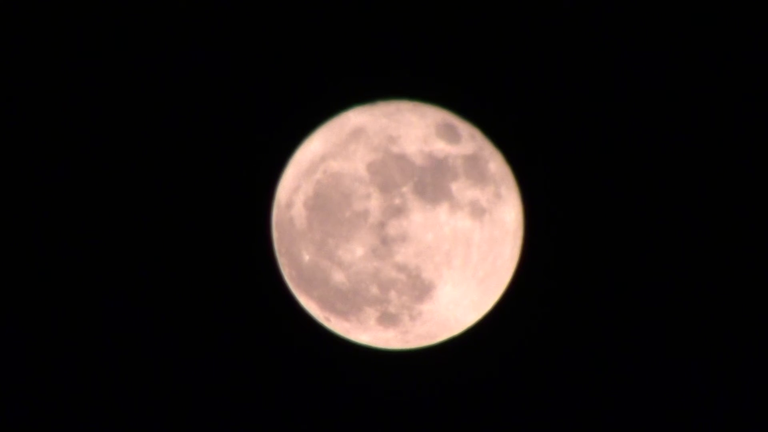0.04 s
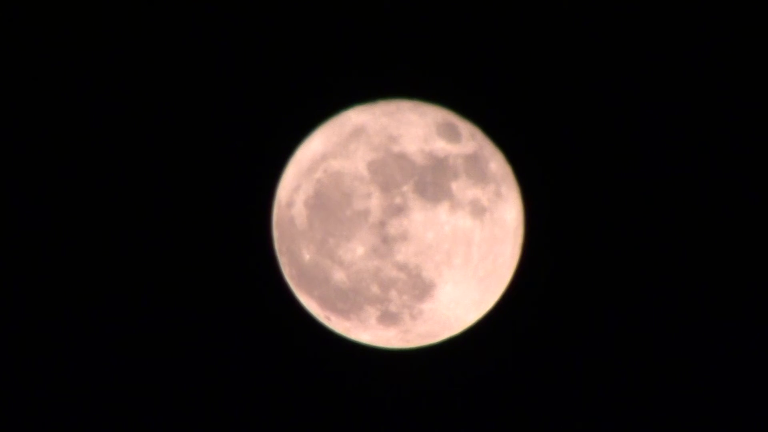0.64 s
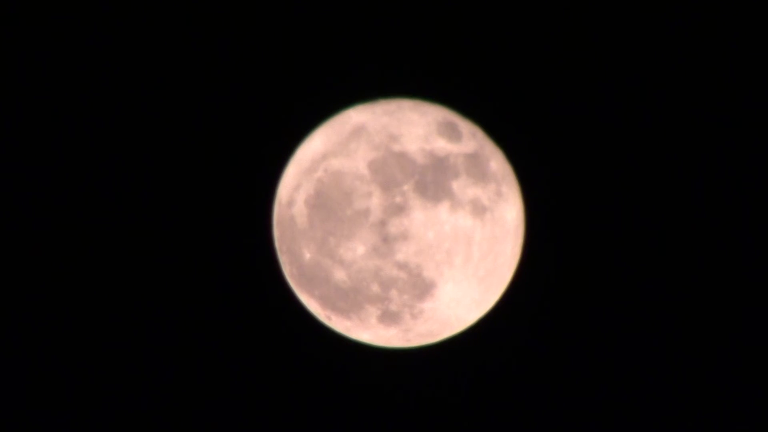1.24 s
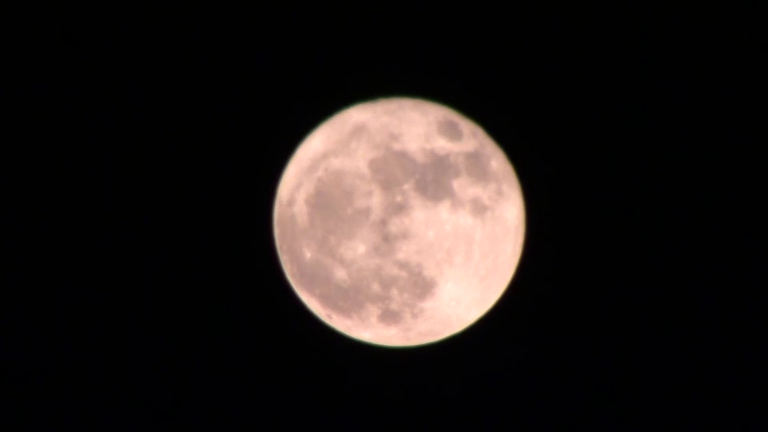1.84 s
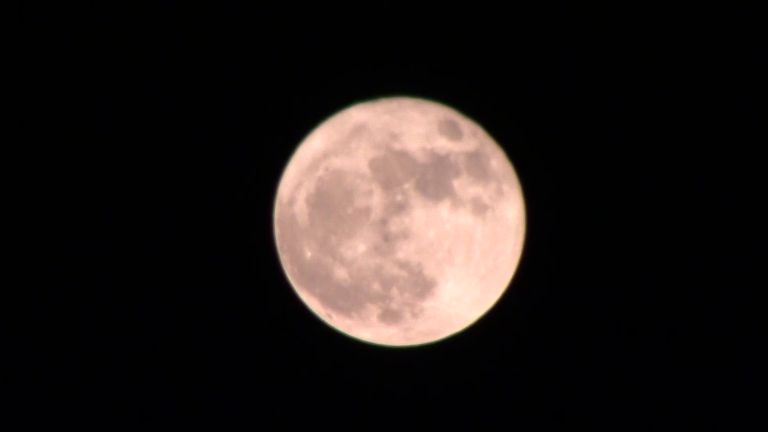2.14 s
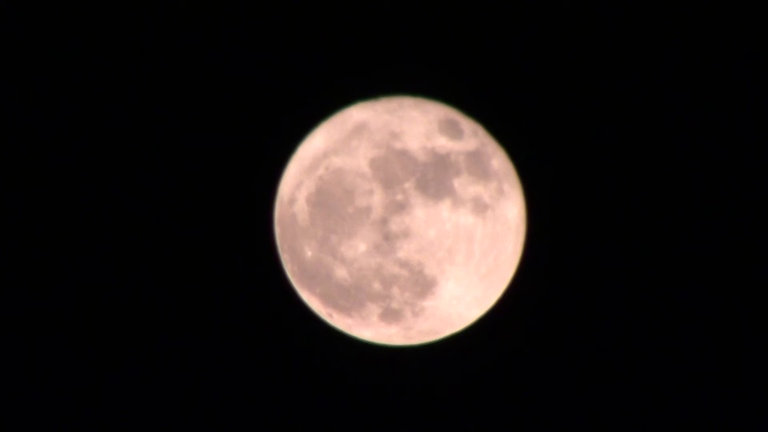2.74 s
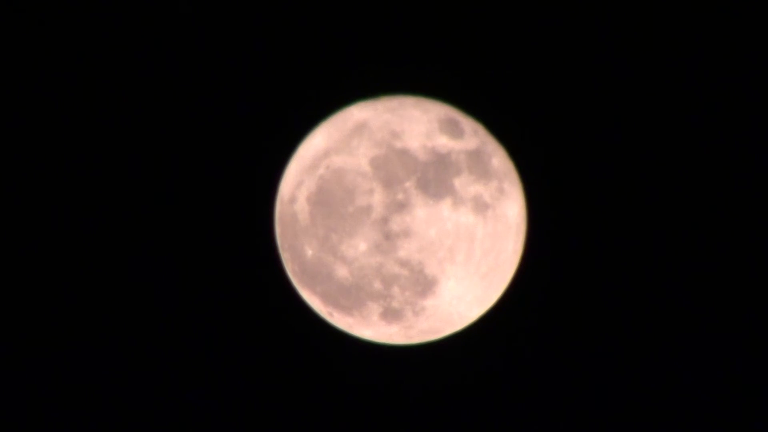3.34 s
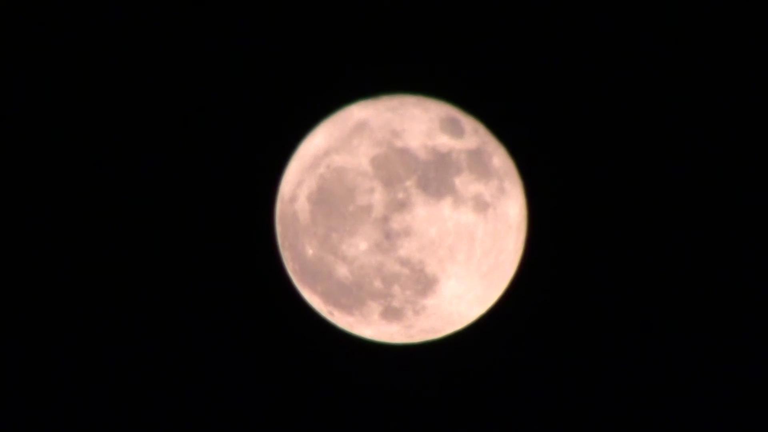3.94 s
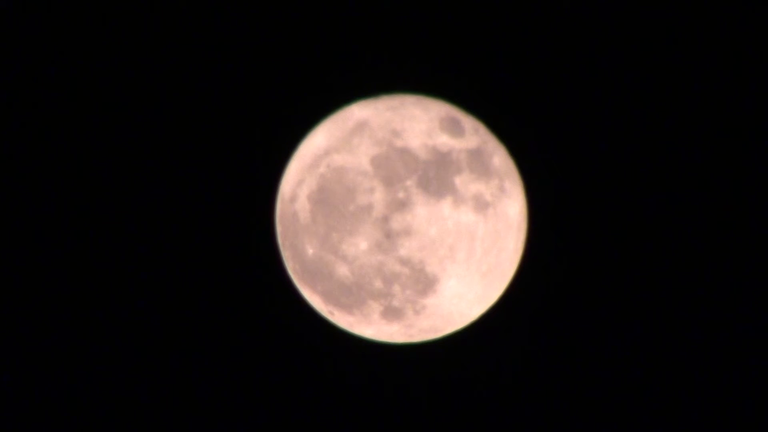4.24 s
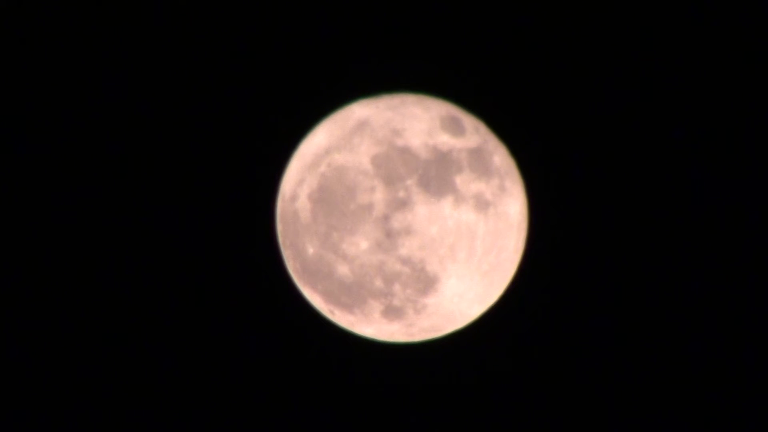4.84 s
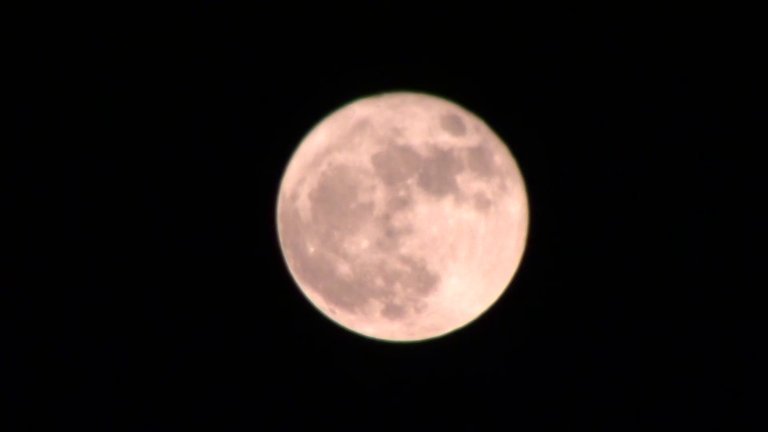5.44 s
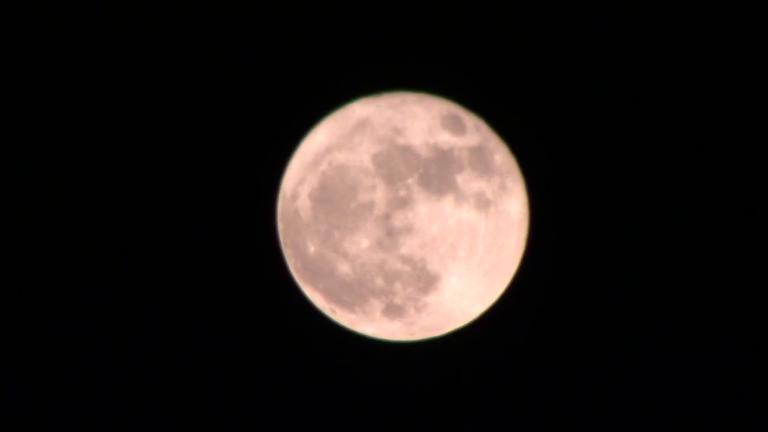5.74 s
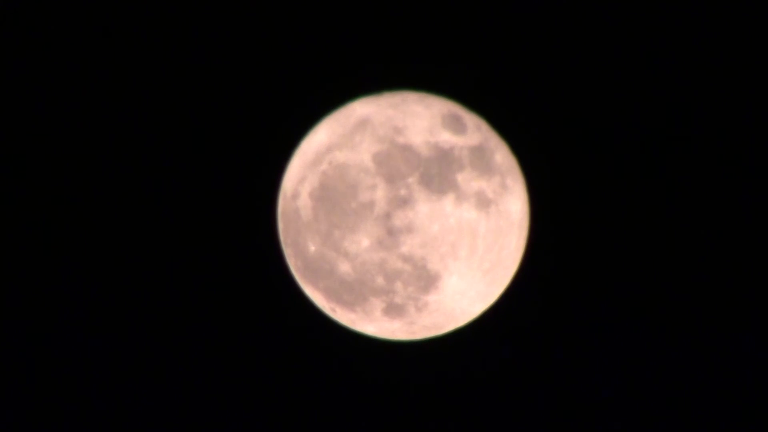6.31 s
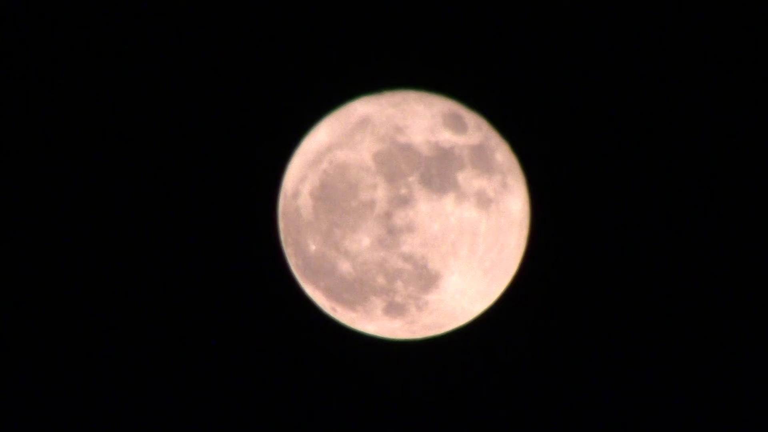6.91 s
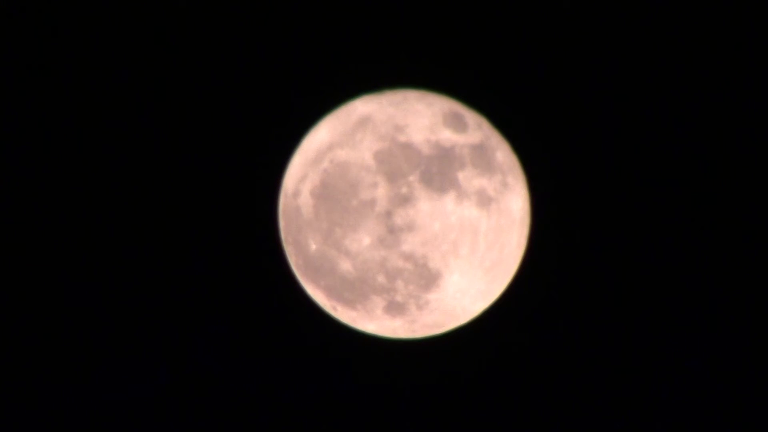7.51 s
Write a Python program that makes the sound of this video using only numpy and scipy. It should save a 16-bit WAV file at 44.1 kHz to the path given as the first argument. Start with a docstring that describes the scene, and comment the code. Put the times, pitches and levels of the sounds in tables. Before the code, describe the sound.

A small owl gives a wavering, falling cry, then a long pulsed trill of soft hoots over quiet night hiss.

```python
"""Small owl at night

A wavering whinny slides down into a growl, then a long trill of soft hoots slows and quickens again.
The owl's syrinx sings a nearly pure tone that gains overtones when pressed; nearby surfaces colour
and echo it. A far animal calls faintly over a quiet hiss, with light ticks and two small knocks.
A limiter flattens the loudest notes."""
import sys
import numpy as np
from scipy import signal
from scipy.fft import rfft, irfft, next_fast_len
from scipy.io import wavfile
from scipy.ndimage import uniform_filter1d, minimum_filter1d, map_coordinates

SR = 44100
rng = np.random.default_rng(int(sys.argv[2]) if len(sys.argv) > 2 else 0)


def materialize(psi):
    """Save the field psi as 16-bit PCM at rate SR to the path in sys.argv[1].

    A 1-D psi becomes a single channel; in a 2-D psi each row is a channel.
    """
    bounded = np.clip(np.atleast_2d(psi).T, -1, 1)
    quanta = np.round(bounded * 32767).astype(np.int16)
    wavfile.write(sys.argv[1], SR, quanta)


N = 338247
TIME = np.arange(N) / SR


def amp(db):
    """Decibels to gain."""
    return 10 ** (np.asarray(db) / 20)


def along(points, hz):
    """Read (frequency, value) points on a log frequency axis."""
    freqs, values = np.transpose(points)
    return np.interp(np.log(hz + 1), np.log(freqs), values)


def curves(rows):
    """One value per sample for each column after the time."""
    times, *columns = np.transpose(rows)
    return [np.interp(TIME, times, column) for column in columns]


def wobble(rate):
    """A smooth random curve, rate knots a second."""
    knots = rng.standard_normal(int(N * rate / SR) + 4)
    return map_coordinates(knots, [TIME * rate])


def filtered(x, response):
    """Filter x by a complex response of frequency."""
    size = next_fast_len(N + SR // 2)
    return irfft(rfft(x, size) * response(np.fft.rfftfreq(size, 1 / SR)), size)[:N]


def noise(response):
    """Coloured noise of rms 1."""
    x = filtered(rng.standard_normal(N), response)
    return x / np.sqrt(np.mean(x ** 2) + 1e-20)


def band(centre_hz, half_width_hz, slope=4):
    """Noise of rms 1 in one resonance."""
    return noise(lambda hz: 1 / (1 + (np.abs(hz - centre_hz) / half_width_hz) ** slope))


# Dark bed of night air: (frequency [Hz], relative level [dB])
AIR_SPECTRUM = [(18, -56.5), (30, -40), (126, -11), (173, -11), (270, -8), (443, -5.5), (546, -2.5),
                (897, -7.5), (970, -8), (1200, -12), (1870, -15.5), (2690, -22), (3780, -24), (7260, -28.5),
                (15500, -42.5)]
# Colour of the brighter hiss: (frequency [Hz], relative level [dB])
HISS_SPECTRUM = [(300, -16.5), (800, 2.5), (1500, 3.5), (2200, 5.5), (2750, -2.5), (3400, -2), (3900, 3),
                 (4500, -7), (5000, -7), (5700, -5.5), (6600, -13.5), (8000, -39.5), (12000, -42.5)]
# The hiss comes and goes: (time [s], level [dB])
HISS_FADES = [(0, -48), (.6, -65.5), (.9, -57.5), (2.4, -57), (4.5, -57.5), (5.8, -60.5), (6.45, -59),
              (6.63, -55), (6.9, -56), (7.15, -64.5), (7.67, -66)]
# Hum and whine: (centre [Hz], half width [Hz], level [dB])
HUM_BANDS = [(203.4, 2.5, -69.5), (227.3, 8.1, -69.5), (295.4, 9.7, -72), (11150, 240, -86.5)]
def background(air_db=-55.5, drift_db=1.3):
    """Still air, a drifting hiss and faint narrow hums."""
    air = amp(air_db) * noise(lambda hz: amp(along(AIR_SPECTRUM, hz)))
    hiss_db = curves(HISS_FADES)[0] + drift_db * wobble(18)
    hiss = amp(hiss_db) * noise(lambda hz: amp(along(HISS_SPECTRUM, hz)))
    hum = sum(amp(db) * band(hz, half_width, slope=2) for hz, half_width, db in HUM_BANDS)
    return air + hiss + hum


# Faint high ticks and rustles, and thin whistles near 6.3 kHz riding on the slow hoots: (time [s], length [s],
# centre [Hz], level [dB])
TICK_BURSTS = [(0.709, 0.028, 5470, -62.5), (2.378, 0.044, 3330, -58.5), (4.674, 0.014, 6280, -63),
               (4.791, 0.018, 6320, -61.5), (4.901, 0.014, 6500, -64), (5.005, .02, 6300, -61.5),
               (5.066, 0.021, 5320, -62.5), (5.155, 0.029, 3830, -53.5), (6.626, 0.039, 1770, -53.5),
               (6.636, 0.045, 3300, -58), (7.113, 0.046, 5000, -64)]
def ticks(width_share=0.088):
    """Brief soft bursts of narrow noise."""
    return sum(amp(db) * np.exp(-(2 * (TIME - s) / length) ** 2) * band(hz, width_share * hz)
               for s, length, hz, db in TICK_BURSTS)


# Distant wash under the far calls: (time [s], level [dB])
MURMUR_FADES = [(.7, -73), (1.2, -57.5), (1.8, -59), (2.2, -59), (2.6, -60.5), (3.2, -63.5), (6.9, -61.5),
                (7.2, -90)]
def murmur(centre_hz=682, half_width_hz=36, swing_db=2):
    """A narrow band of noise, like far echoes running together."""
    return amp(curves(MURMUR_FADES)[0] + swing_db * wobble(8)) * band(centre_hz, half_width_hz)


# The far animal's cues: (middle time [s], length [s], relative level [dB], pitch [Hz])
FAR_CALLS = [(1.094, 0.035, -66, 675), (1.235, 0.061, -57, 725), (1.442, 0.085, -60.5, 735),
             (1.655, 0.026, -50.5, 695), (1.803, 0.071, -58.5, 690), (2.192, 0.088, -65, 610),
             (2.526, 0.019, -51.5, 700), (2.582, 0.022, -53.5, 695), (2.723, .07, -64.5, 660),
             (2.916, 0.027, -58, 670), (3.173, .1, -63, 690), (6.762, 0.12, -62, 690),
             (6.983, 0.024, -57.5, 690)]
def far_calls(arch=0.043, roughness=0.0576, lower_db=-10):
    """Short hoarse calls that arch in pitch, with a softer partial a fifth below."""
    out, unsteady = np.zeros(N), wobble(180)
    offsets = np.arange(-(SR // 6), SR // 6)
    for s, length, db, hz in FAR_CALLS:
        at = round(s * SR) + offsets
        position = np.clip(2 * offsets / SR / length, -4, 4)
        pitch_hz = hz * (1 - arch * position ** 2 + roughness * unsteady[at])
        phase = 2 * np.pi * np.cumsum(pitch_hz) / SR
        tone = np.sin(phase) + amp(lower_db) * np.sin(phase * 2 / 3)
        out[at] += amp(db) * np.exp(-position ** 2) * tone
    return out


# Two small knocks: (time [s], relative level [dB], ring [Hz], tick against the ring [dB])
KNOCK_HITS = [(6.917, -33.5, 667, -14), (7.357, -33, 338, -26.5)]
def knocks(ring_t60=0.031, tick_t60=0.042, tick_hz=1800, attack_s=0.00091, trim_db=-3):
    """Each knock is a damped ring with a dull tick."""
    out = np.zeros(N)
    dull_noise = noise(lambda hz: hz / (hz + 400) / (1 + (hz / tick_hz) ** 4))
    t = np.arange(SR // 8) / SR
    onset = 1 - np.exp(-t / attack_s)
    for s, db, hz, tick_db in KNOCK_HITS:
        at = round(s * SR) + np.arange(len(t))
        ring = np.sin(2 * np.pi * hz * t) * amp(-60 * t / ring_t60)
        tick = amp(tick_db - 60 * t / tick_t60) * dull_noise[at]
        out[at] += amp(db + trim_db) * onset * (ring + tick)
    return out


# Reverb decay of the yard: (frequency [Hz], time to fall 60 dB [s])
YARD_DECAY = [(200, 0.3), (700, 0.37), (2000, 1), (8000, 0.013)]
def yard_reverb(x, predelay_s=.014):
    """A diffuse tail: the upper mids linger and the top dies first."""
    hz, t, spectrum = signal.stft(rng.standard_normal(SR // 2), SR, nperseg=256)
    decay = amp(-60 * t / along(YARD_DECAY, hz)[:, None])
    tail = signal.istft(spectrum * decay, SR, nperseg=256)[1]
    delayed = np.pad(x, (int(predelay_s * SR), 0))
    return signal.fftconvolve(delayed, tail / np.linalg.norm(tail))[:N]


# Early reflections off nearby surfaces: (delay [s], gain [ratio])
ECHO_TAPS = [(.00257, .665), (.00495, .562), (.00693, 1.013), (.00776, 1.013), (.01695, .191),
             (.03145, .124), (.03731, .22), (.0481, .082), (.07198, .047), (.07924, .09)]
# Resonances of the surroundings that ring on: (centre [Hz], width [Hz], gain [dB])
RESONANCES = [(702.8, 6.4, 4.5), (1260, 45, 2.5), (1470, 20, -7.5), (1650, 23, 7)]
def nearby_surfaces(x):
    """Direct sound, reflections and resonances cancel or reinforce as the pitch moves."""
    def response(hz):
        echoes = sum(gain * np.exp(-2j * np.pi * hz * delay) for delay, gain in ECHO_TAPS)
        rings = sum(amp(db) * 1j * hz * width / (centre ** 2 - hz ** 2 + 1j * hz * width)
                    for centre, width, db in RESONANCES)
        return 1 + echoes + rings
    return filtered(x, response)


def pop(t, centre_hz=950, length_s=.0008):
    """A tiny soft pop at t = 0."""
    return np.cos(2 * np.pi * centre_hz * t) * np.exp(-(t / length_s) ** 2)


def second_voice(waver, pitch_hz=877):
    """The other side of the syrinx: an unsteady higher tone, independent of the main pitch."""
    return np.sin(2 * np.pi * np.cumsum(pitch_hz * (1 + waver * wobble(150))) / SR)


def syrinx(phase, pitch_hz, octave_gain, upper_db, colour):
    """A nearly pure tone with its octave and upper harmonics shaped by a colour curve."""
    upper = sum(amp(along(colour, k * pitch_hz)) * np.sin(k * phase) for k in range(3, 12))
    return np.sin(phase) + octave_gain * np.sin(2 * phase) + amp(upper_db) * upper


def beak(pitch_hz, centre_hz=1326, half_width_hz=33):
    """Gain of the octave as it slides through a resonance of the beak."""
    return 1 / (1 + ((2 * pitch_hz - centre_hz) / half_width_hz) ** 4)


# The cry's gesture: (time [s], pitch [Hz], level [dB], octave [dB], upper drive [dB], growl [0-1])
WHINNY_GESTURE = [(0.0, 838.5, -14.5, -12, 11.5, 0.0), (0.049, 831, -26.5, -7.5, 13, 0.07),
                  (0.086, 814, -25, -10, 5.5, 0.0), (0.096, 831, -17.5, -24, 1.5, 0.0),
                  (0.136, 833, -23.5, -6.5, 15.4, 0.02), (0.181, 786, -27.5, -18.5, 1, 0.0),
                  (0.215, 806, -22, -18.5, 4.5, 0.07), (0.259, 804, -36.0, -1.5, 8, 0.17),
                  (0.28, 754, -28.5, -17, 5, 0.29), (0.327, 822, -26, -10, -5, 0.08),
                  (0.337, 680.4, -23, -10.5, 3.5, 0.3), (0.378, 716, -29.5, -16.5, -3, 0),
                  (0.411, 652, -22, -3.2, 6.5, 0.25), (0.454, 658, -19.5, -20.5, -10, 0.2),
                  (0.487, 653.3, -21.5, -11, 0.5, 0.35), (0.501, 597, -22.5, -26, -1, 0.23),
                  (0.52, 579.4, -22.5, -25, -13, 0.1), (0.561, 679.0, -25, -9.5, 3, 0.0),
                  (0.571, 617.0, -17, -27.0, -13, 0), (0.6, 508.0, -33.5, -20, -28, 0.5),
                  (0.625, 560, -24, -22, -32, 0.63), (0.65, 576, -26, -25, -21, 0.3),
                  (0.68, 557, -30, -18.5, -27, 0.77), (0.72, 577, -35.5, -23, -28, 0.57),
                  (0.77, 560.0, -51, -11, -22.0, 0.5)]
# Throat colour on the upper harmonics and husk: (frequency [Hz], gain [dB])
WHINNY_THROAT = [(1500, 3.5), (1950, -24.5), (2200, -38.5), (2500, -36.5), (2800, -45.5), (3250, -40),
                 (3600, -43.5), (4050, -41), (4600, -59), (5500, -63.5), (5950, -51.5), (6800, -64.5),
                 (7800, -70.5), (9500, -100)]
# Shrill accents: (middle time [s], length [s], upper boost [dB])
SHRILL_FLASHES = [(0.049, 0.031, 16.5), (0.11, 0.017, 14), (0.136, 0.024, 10.5), (0.21, 0.013, 16),
                  (.42, 0.023, 5.5)]
# Second voice in the growl: (time [s], level against the main tone [dB])
GROWL_SECOND_VOICE = [(.57, -46), (.61, -10.5), (.65, -23), (.68, -9), (.74, -8)]
# The voice cracks as it jumps down: (time [s], level [dB])
VOICE_CRACKS = [(0.327, -42.5), (.42, -40), (0.514, -44), (.565, -39)]
def whinny(waver_hz=11.6, speedup_hz_per_s=10.6, crest_s=.052, waver_depth=0.012, dip_db=3,
           shimmer_db=2, husk_db=-29, husk_hz=2400, attack_s=.003, end_s=.775, release_s=.05):
    """A falling cry with a quickening waver; it cracks midway, then roughens into a growl."""
    pitch_hz, db, octave_db, upper_db, growl = curves(WHINNY_GESTURE)
    t = TIME - crest_s
    waver = np.cos(2 * np.pi * (waver_hz * t + speedup_hz_per_s * t ** 2 / 2))
    dip = dip_db * ((1 - waver) / 2) ** 4  # fainter in each trough
    jitter = (0.0039 + 0.037 * growl) * wobble(170)
    rasp = (0.002 + 0.0025 * growl) * wobble(700)
    pitch_hz = pitch_hz * (1 + waver_depth * waver + jitter + rasp)
    phase = 2 * np.pi * np.cumsum(pitch_hz) / SR
    flash_db = sum(boost * np.exp(-(2 * (TIME - s) / length) ** 4)
                   for s, length, boost in SHRILL_FLASHES)
    upper_db = upper_db + shimmer_db * wobble(250.4) + flash_db
    voice = syrinx(phase, pitch_hz, amp(octave_db), upper_db, WHINNY_THROAT)
    voice += amp(curves(GROWL_SECOND_VOICE)[0]) * second_voice(waver=0.0099)
    breath = noise(lambda hz: amp(along(WHINNY_THROAT, hz)) / (1 + (husk_hz / (hz + 1)) ** 10))
    husk = growl * amp(husk_db + upper_db) * breath
    flutter = 1 + growl * wobble(200)
    gate = np.clip(np.minimum(TIME / attack_s, (end_s - TIME) / release_s), 0, 1)
    cracks = sum(amp(crack_db) * pop(TIME - s) for s, crack_db in VOICE_CRACKS)
    return gate * amp(db - dip) * (voice * flutter + husk) + cracks


# Second voice at the onset of the early hoots: (time [s], level against the hoot [dB])
HOOT_SECOND_VOICE = [(3.33, -42), (3.41, -25.5), (3.5, -30), (3.82, -30.5), (3.92, -58), (4.4, -37.5),
                     (4.6, -47)]
# Shape of the hoots' pitch drop along the trill:
# (time [s], half the drop [share of pitch], half its duration [s], softening before it [dB])
PITCH_DROPS = [(3.35, 0.024, 0.0029, 6.5), (3.9, 0.048, 0.0025, 4), (4.29, 0.052, 0.0032, 9.5),
               (4.45, 0.015, 0.0047, -0.2), (4.9, 0.025, 0.015, 2), (5.3, 0.019, 0.0052, 9),
               (5.8, 0.015, 0.0072, 8.5), (6.5, 0.0047, 0.0044, 14.5)]
# A soft click and brief noise burst near 950 Hz in each hoot: (time [s], level against the hoot [dB])
HOOT_CLICKS = [(3.35, -43), (3.9, -41.5), (4.29, -34), (4.5, -31), (5, -34.5), (5.3, -34.5), (5.6, -38),
               (5.9, -37.5), (6.5, -39)]
# Colour of the faint buzzy upper harmonics on the hoots: (frequency [Hz], gain [dB])
HOOT_BUZZ = [(1700, -31.5), (1900, -35), (2050, -43.5), (2200, -48.5), (2550, -56.5), (2850, -49),
             (3200, -39.5), (3550, -52), (3900, -51.5), (4400, -57.5), (6000, -67.5), (6400, -71),
             (7000, -78)]
# One row a hoot:
# (middle time [s], length [s], relative level [dB], pitch [Hz], drop after middle [s], pressing [dB])
HOOT_NOTES = [(3.344, 0.041, -13.5, 658.2, 0.014, -24.5), (3.413, 0.04, -13.5, 665, 0.014, -18),
              (3.49, 0.034, -15, 658.2, 0.0087, -13.5), (3.564, 0.043, -17, 651.7, 0.013, -17),
              (3.635, 0.031, -15, 656, 0.0085, -12.5), (3.706, 0.045, -16, 651.2, 0.0093, -15),
              (3.78, 0.045, -15.5, 649, 0.011, -16.5), (3.849, 0.043, -14.5, 648.7, 0.011, -20),
              (3.922, 0.059, -20, 651, 0.0084, -15), (3.989, 0.045, -16.5, 657.3, 0.016, -14),
              (4.064, 0.031, -15, 649.4, 0.0096, -19), (4.127, 0.049, -14, 657, 0.013, -18.5),
              (4.206, 0.034, -14, 646, 0.012, -19), (4.28, 0.051, -13.5, 654.4, 0.017, -12.0),
              (4.407, 0.064, -16, 652, 0.0083, -12.5), (4.522, 0.054, -17.0, 642.2, -0.013, -18),
              (4.642, 0.06, -16.5, 638.0, -0.016, -16.5), (4.76, 0.063, -13.5, 642, -0.015, -19.5),
              (4.88, 0.054, -16, 635.4, -0.014, -17), (4.988, 0.05, -11.5, 634, -0.02, -31),
              (5.091, 0.049, -14, 628.6, -0.0086, -32), (5.178, 0.038, -11.0, 622.7, 0.0036, -29),
              (5.274, 0.034, -11.0, 628, 0.00011, -25.5), (5.346, 0.035, -14.5, 636.4, -0.01, -28.5),
              (5.397, 0.051, -15.0, 628, -0.00013, -31), (5.466, 0.025, -12, 623, -0.0026, -29),
              (5.527, 0.051, -18, 636.4, -0.014, -35), (5.578, 0.035, -12.5, 625.5, -0.0085, -34),
              (5.642, 0.03, -17, 621.6, -0.0081, -29.5), (5.7, 0.027, -12.5, 620, -0.0021, -33),
              (5.762, 0.027, -11, 623.5, -0.0014, -30), (5.822, 0.032, -13, 625, -0.004, -37.5),
              (5.882, 0.028, -16, 619, -0.0045, -34), (5.943, 0.022, -13.5, 620, -0.0061, -31),
              (6.006, 0.021, -16, 618.4, -0.0091, -32.5), (6.066, 0.019, -15, 617, -0.0081, -32),
              (6.129, 0.02, -14.5, 621, -0.0081, -34.0), (6.186, 0.029, -17.5, 617, -0.0076, -29),
              (6.243, 0.028, -12.5, 615, -0.0038, -29.5), (6.308, 0.025, -15.5, 615, -0.0092, -34.0),
              (6.37, 0.018, -14, 608, -0.0091, -31), (6.428, 0.019, -13, 604.5, -0.0035, -30),
              (6.486, 0.031, -17.5, 594, -0.00061, -46)]
def trill(lead_s=0.026, attack_s=0.0078, press_lead_s=0.02, press_length_s=0.018, bite_db=-22,
          upper_bite_db=11.5, burst_s=0.0065, trim_db=0.58):
    """Each hoot swells, is pressed, drops in pitch with a soft click, and fades."""
    out = np.zeros(N)
    second = second_voice(waver=0.035) + amp(-14) * band(1600, 390)  # with a little husk
    second *= amp(curves(HOOT_SECOND_VOICE)[0])
    unsteady = 0.0089 * wobble(220) + 0.00075 * wobble(1200)
    burst = amp(-4) * band(930, 210)
    shapes = np.transpose(curves(PITCH_DROPS) + curves(HOOT_CLICKS))
    half = SR // 10
    offsets = np.arange(-half, half)
    t = offsets / SR
    for s, length, db, hz, drop_at, press_db in HOOT_NOTES:
        at = round(s * SR) + offsets
        drop, drop_s, soften_db, click_db = shapes[at[half]]
        position = np.clip(2 * t / length, -3, 3)
        since_drop = t - drop_at
        dropped = np.tanh(since_drop / drop_s)  # -1 before the drop, 1 after it
        # the tone starts once the pressure passes a threshold
        gate = np.sin(np.pi / 2 * np.clip((t + lead_s + .34 * length) / attack_s, 0, 1))
        steepness = np.where(position < 0, 2.5, 2.62)  # rise, fall
        swell = np.exp(-np.abs(position) ** steepness) * amp(soften_db * (dropped - 1) / 2)
        pitch_hz = hz * (1 + 0.0035 * position ** 2 - drop * dropped)
        phase = 2 * np.pi * np.cumsum(pitch_hz * (1 + unsteady[at])) / SR
        pressed = beak(pitch_hz) * np.exp(-((since_drop + press_lead_s) / press_length_s) ** 2)
        octave = amp(-28.5 + 0.22 * press_db) * swell
        flare = amp(press_db) * pressed / (swell + amp(bite_db))  # bites before the tone has swelled
        upper_db = 1 + 0.31 * press_db + upper_bite_db * pressed
        tone = swell * syrinx(phase - phase[half], pitch_hz, octave + flare, upper_db, HOOT_BUZZ)
        tone += second[at] * np.exp(-2 * (position + 1) ** 2)
        click = pop(since_drop) + burst[at] * np.exp(-(since_drop / burst_s) ** 2)
        out[at] += amp(db + trim_db) * (gate * tone + amp(click_db) * click)
    return out


def scene(cry_send_db=-16, hoot_send_db=-26, far_direct_db=10):
    """Mono mix: the owl close by, the far animal with more reverb, the night bed underneath."""
    cry, hoots, far = whinny(), trill(), far_calls()
    reverb = yard_reverb(amp(cry_send_db) * cry + amp(hoot_send_db) * hoots + far)
    owl = nearby_surfaces(cry + hoots)
    return (owl + reverb + amp(far_direct_db) * far + murmur() + knocks() + ticks() + background())[None]


def record(dry, ceiling_db=-19, sense_s=.0016, hold_s=0.0011, attack_s=0.001,
           bass_hz=350, split_hz=1080, top_hz=15700):
    """A fast limiter on the lower midrange, then a steep high cut."""
    low = filtered(dry[0], lambda hz: 1 / (1 + (hz / split_hz) ** 12))
    level = np.sqrt(2 * np.abs(uniform_filter1d(low ** 2, int(sense_s * SR) + 1)) + 1e-12)
    needed = minimum_filter1d(np.minimum(1, amp(ceiling_db) / level), int(hold_s * SR) + 1)
    gain = uniform_filter1d(needed, int(attack_s * SR) + 1)
    excess = filtered(low * (1 - gain), lambda hz: 1 - 1 / (1 + (hz / bass_hz) ** 6))  # spares the bass
    return filtered(dry[0] - excess, lambda hz: hz < top_hz)[None]


dry = scene()
out = record(dry)
materialize(out)
```